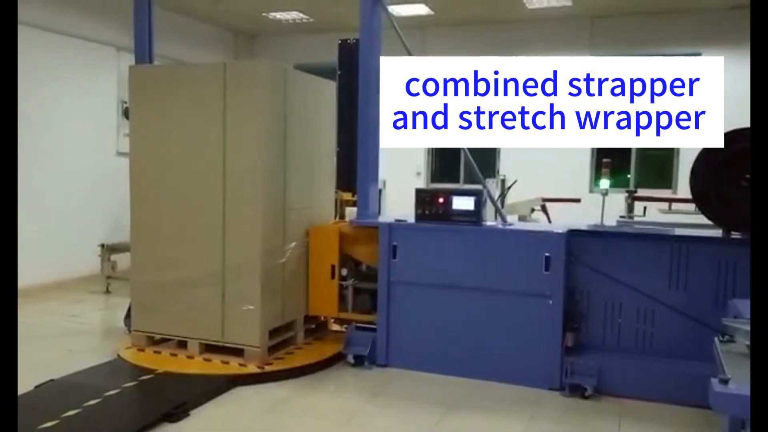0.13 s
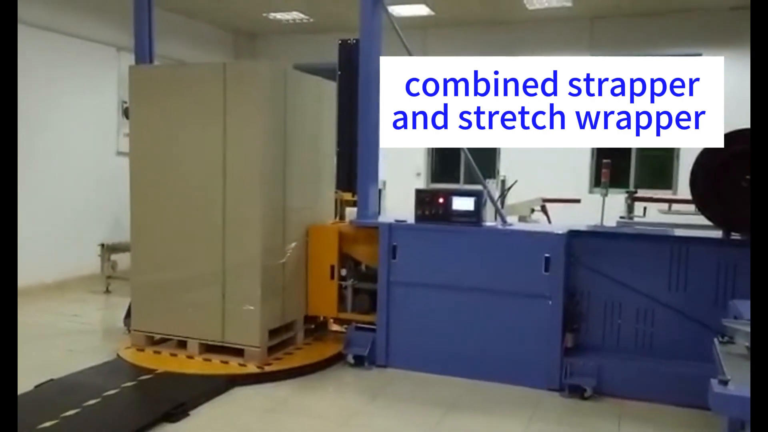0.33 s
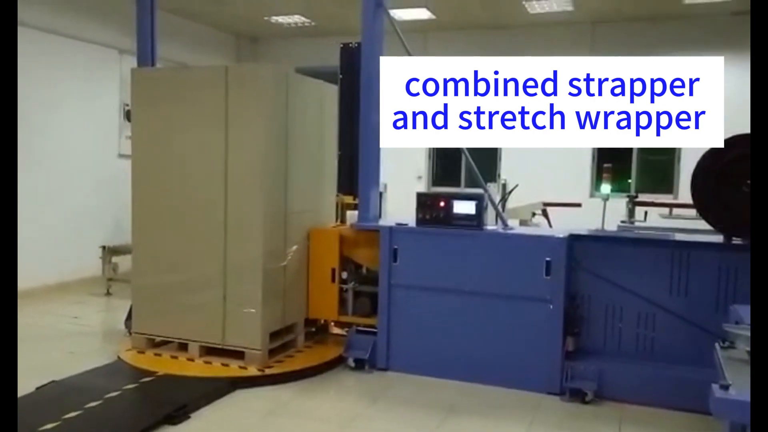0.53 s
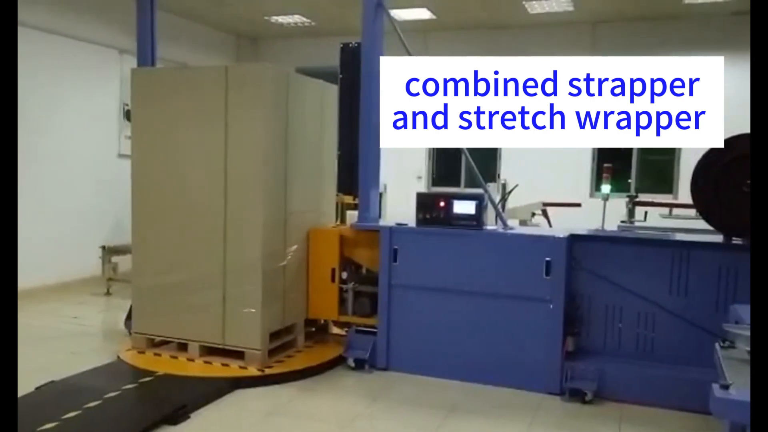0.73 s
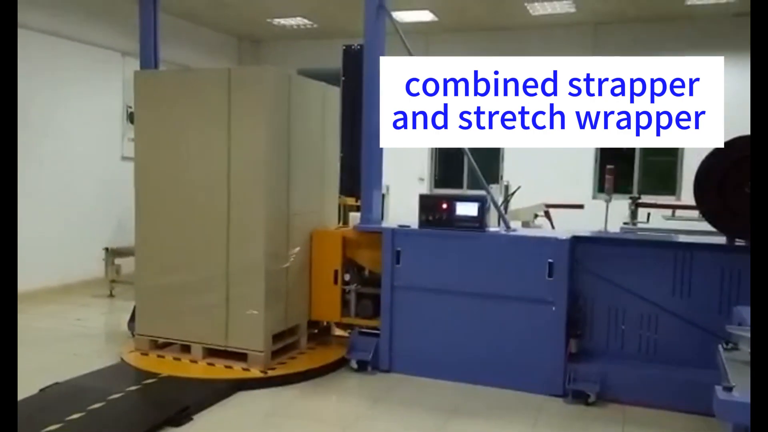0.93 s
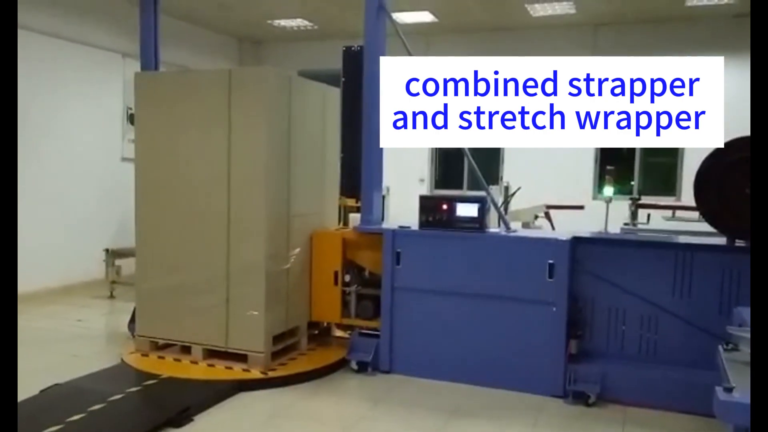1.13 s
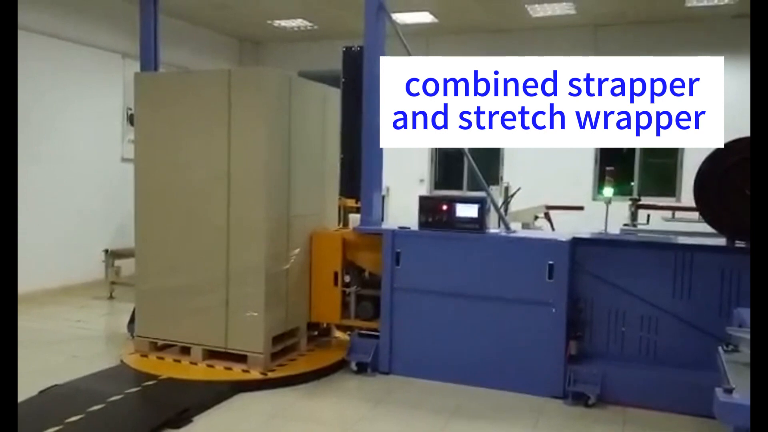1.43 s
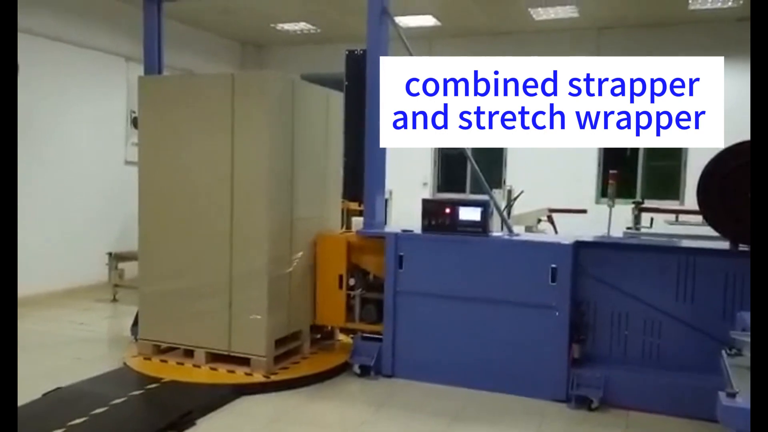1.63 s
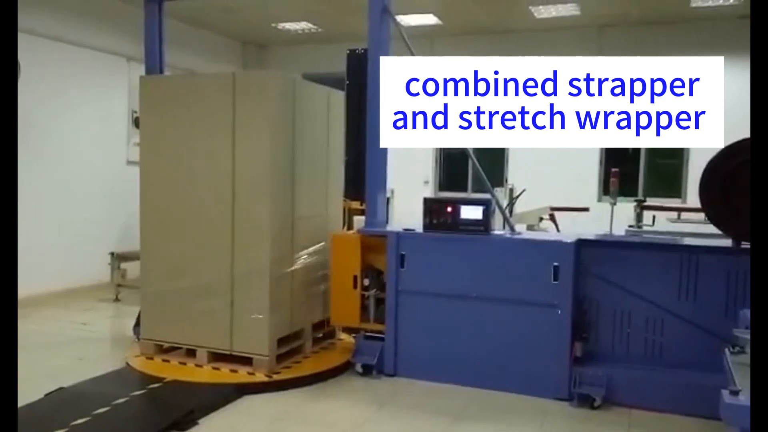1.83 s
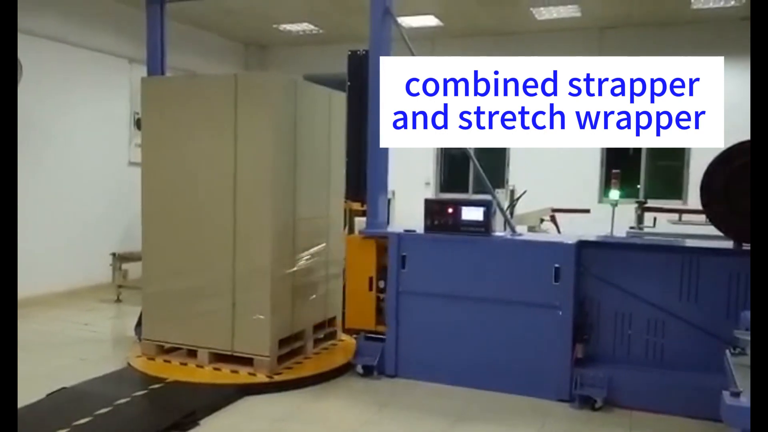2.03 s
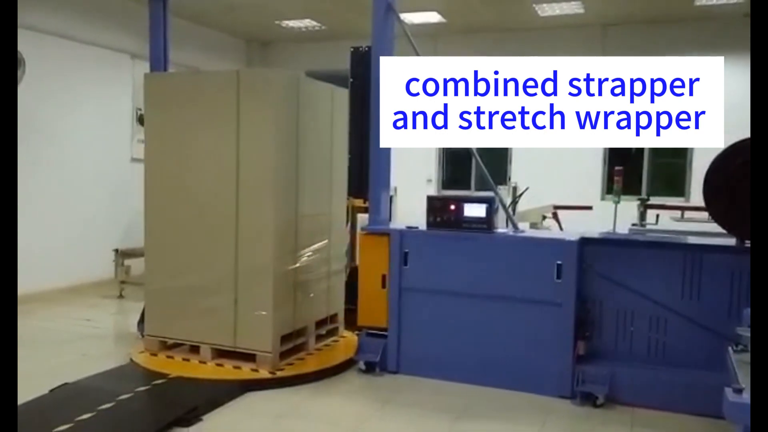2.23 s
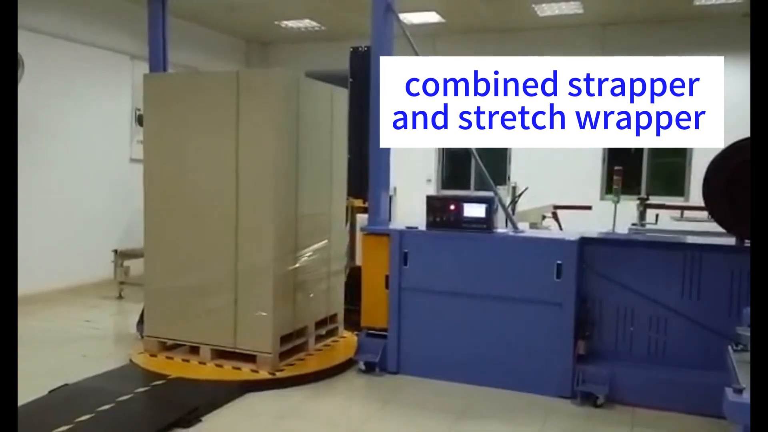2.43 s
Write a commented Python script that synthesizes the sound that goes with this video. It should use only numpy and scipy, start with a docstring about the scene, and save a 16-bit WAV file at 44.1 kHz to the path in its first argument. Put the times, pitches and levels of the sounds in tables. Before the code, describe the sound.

Uneven mechanical clacking from a turntable packaging machine, busiest in the first second, thinning out midway, with low drive rumble and faint hiss beneath, ending on a bright metallic crack; single-channel phone pickup, hard room echo.

```python
"""Pallet wrapping and strapping machine

The machine works in a hard-walled hall, heard from several metres by a phone. Latches and linkages clack
and snap: bursts of noise that die away in separate bands, each with a short hall tail. Chains and rollers
rattle as crowds of tiny noise ticks, and a strap guide squeals at the start as a tone blurred by noise.
Under it all, shaped noise makes the rumble of the drive and a steady hiss.
"""
import sys
import numpy as np
from scipy import signal
from scipy.fft import rfft, irfft
from scipy.io import wavfile
from scipy.ndimage import uniform_filter1d

SR = 44100
rng = np.random.default_rng(int(sys.argv[2]) if len(sys.argv) > 2 else 0)


def persist_wave(psi):
    """Save psi, clipped to +-1, as 16-bit WAV."""
    counts = np.round(np.clip(psi, -1, 1) * 32767).astype(np.int16)
    wavfile.write(sys.argv[1], SR, np.atleast_2d(counts).T)


N = 114219  # length [samples]

# In every table, t60 is the time a sound takes to fall by 60 dB.
# Levels of clacks and rattle are those before scene() mixes the layers.

# Tone colour of the steady hiss: (frequency [Hz], relative level per Hz [dB])
HISS_COLOUR = [(290, -60), (500, 7), (1000, -4), (1800, -6.5), (3600, -7), (5200, -9), (7500, -37.5),
               (9500, -26.5), (12000, -36)]
HISS_DB = -41

# Strength of the drive rumble: (time [s], rumble level [dB], deep bass level [dB])
DRIVE_LEVELS = [(0.0, -31.5, -68), (0.06, -35.5, -58), (0.1, -30, -54), (0.16, -44, -54),
                (0.22, -34.5, -69), (0.47, -28.5, -41), (0.5, -31, -51), (0.55, -29, -36),
                (0.66, -35.5, -49), (1.02, -31.5, -46), (1.14, -36.5, -54), (1.17, -35.5, -53),
                (1.28, -35, -51), (1.34, -34, -32), (1.38, -35, -50), (1.49, -38, -43),
                (1.57, -31.5, -52.5), (1.82, -38, -47), (1.85, -37.5, -46), (2.16, -33, -42.5),
                (2.31, -28.5, -39), (2.35, -33.5, -45), (2.47, -32.5, -36), (2.5, -33.5, -56),
                (2.57, -30, -43), (2.59, -31, -53)]
# Tone colour of the rumble: (frequency [Hz], relative level per Hz [dB])
RUMBLE_COLOUR = [(95, -41), (135, -1.5), (178, -2), (248, -1.5), (384, -6.5), (430, -6), (900, -23.5),
                 (1500, -23), (3300, -120)]
# Tone colour of the deep bass: (frequency [Hz], relative level per Hz [dB])
DEEP_BASS_COLOUR = [(13, -47), (22, -19), (43, -17), (120, -5), (160, -23), (260, -120)]

# Strength of the strap guide's squeal: (time [s], level [dB])
SQUEAL_LEVELS = [(0, -22), (.035, -34), (.055, -27), (.08, -30), (.11, -25), (.16, -31), (.205, -27.5),
                 (.25, -30), (.3, -43), (.4, -58)]
# Its gliding pitch: (time [s], frequency [Hz])
SQUEAL_GLIDE = [(0, 3000), (.04, 3060), (.17, 3060), (.22, 2970), (.27, 2900)]
SQUEAL_WIDTH_HZ, SQUEAL_TONE_DB = 230, -2  # width of the noise; tone against each of its two noise parts

# Strength of the chains and rollers: (time [s], main level [dB], low part level [dB], treble level [dB])
RATTLE_LEVELS = [(0.0, -20, -31.5, -41), (0.17, -26, -34, -44.5), (0.25, -20.5, -32, -41.5),
                 (0.4, -23.5, -28.5, -50.5), (0.54, -35, -41, -69), (0.55, -30, -32, -52),
                 (0.61, -29.5, -38, -55), (0.64, -31.5, -19, -57), (0.71, -27, -44, -59),
                 (0.72, -27.5, -33, -61), (0.89, -25.5, -25, -54), (1.04, -25.5, -28, -59),
                 (1.16, -36.5, -33, -59), (1.27, -37, -29, -59), (1.36, -28, -29.5, -57),
                 (1.52, -36.5, -30, -59), (1.57, -26.5, -28, -59), (1.7, -38, -35, -59),
                 (1.95, -39.5, -47, -59), (2.04, -39.5, -36, -61), (2.06, -36.5, -37, -52),
                 (2.14, -32, -43, -60), (2.15, -28, -33, -57), (2.2, -26.5, -30, -60),
                 (2.34, -33.5, -28.5, -53), (2.36, -30, -37, -48), (2.54, -23.5, -23.5, -50),
                 (2.55, -26.5, -29, -45)]
# Tone colour of the main rattle: (frequency [Hz], relative level per Hz [dB])
RATTLE_TONE = [(250, -72), (530, 0), (900, -12.5), (1560, -1), (2140, 0.5), (4430, 1.5), (6400, -15),
               (7950, -37), (12000, -69)]
RATTLE_PER_S, RATTLE_SCATTER_DB, RATTLE_T60_S = 700, 2, 0.066  # tick rate, unevenness, fading time

# Ringing parts of two sharp metallic snaps: (start [s], crack level [dB], centre [Hz], width [Hz],
# crack t60 [s], hall tail against the crack [dB])
SNAP_PARTS = [(2.055, -27, 4770, 1100, 0.057, -10), (2.055, -34.5, 5100, 201, 0.32, -9),
              (2.565, -15.5, 4060, 1500, 0.083, -7), (2.564, -15, 3240, 4820, 0.057, -10),
              (2.563, -23, 660, 1130, .03, -7), (2.566, -32, 9000, 4930, 0.038, -7)]
SNAP_TAIL_T60_S = 0.59

# Blows of latches and linkages: (start [s], first tick [dB], thud [dB], body [dB], knock [dB], clack [dB],
# ring [dB], sizzle [dB], rise time [s])
BLOWS = [(0.033, -7, -50, -27, -32, -24, -24, -52, 0.0029),
         (0.1274, -13, -40, -27, -28, -19, -15.5, -37, 0.0043),
         (0.202, -15, -24, -32, -31, -25, -16.5, -36, 0.0023),
         (0.2534, -13.5, -29, -25, -31.5, -30, -16, -30, 0.0026),
         (0.3474, -13.5, -19, -31, -29.5, -22, -24, -58, 0.0019),
         (0.4194, -21, -35, -46, -37, -30, -36, -69, 0.005),
         (0.4694, -31, -31, -47, -38, -24, -52, -77, 0.0058),
         (0.5444, -21, -27, -26, -26, -37, -15, -34, 0.0089),
         (0.6574, -11, -49, -18.5, -24, -33, -30, -65, 0.005),
         (0.6998, -6, -50, -21, -23, -30, -24, -67, 0.0021),
         (0.7474, -18, -33, -24, -32, -26, -33, -69, 0.0039),
         (0.8094, -11, -45, -38, -45, -20.5, -34, -60, 0.005),
         (0.8594, -16.5, -49, -24, -42, -21, -43, -56, 0.0038),
         (0.896, -21, -30, -34, -30, -32, -39, -49, 0.0031),
         (0.9306, -13.5, -49, -35, -28, -28, -21.5, -36.5, 0.004),
         (1.008, -14, -31, -26.5, -28, -25, -25.5, -43, 0.005),
         (1.0684, -34, -40, -26, -40, -45, -33, -60, 0.004),
         (1.293, -20, -27, -31.5, -29, -34, -20, -45, 0.0054),
         (1.3194, -21, -23.5, -36, -37, -36, -27, -46, 0.0042),
         (1.349, -12.5, -44, -24.5, -28, -27, -24.5, -45, 0.0062),
         (1.5446, -16, -26.5, -28, -34, -25, -21.5, -44.5, 0.0077),
         (1.6294, -48, -24, -40, -40, -40, -52, -60, 0.005),
         (2.058, -19, -32, -26, -33, -37, -23, -47, 0.0044),
         (2.0794, -14, -39, -27, -29, -37, -38, -58.5, 0.005),
         (2.1497, -10.5, -31, -23, -25, -20, -31, -45, 0.005),
         (2.1685, -10, -24.5, -33, -26, -19.5, -21, -37.5, 0.013),
         (2.349, -11, -51, -29, -25.5, -30, -29, -38, 0.012),
         (2.4775, -14, -39, -29, -33, -21.5, -34, -42, 0.0024)]
# Bands of a blow, from thud to sizzle: (low edge [Hz], high edge [Hz], crack t60 [s], hall tail t60 [s],
# hall tail against the crack [dB])
BLOW_BANDS = [(144, 428, 0.042, 0.77, -7.5), (328, 1276, 0.068, 0.89, -7), (1195, 2450, 0.049, 1, -5.5),
              (2193, 2760, 0.032, 0.63, -12), (3190, 5730, 0.014, 0.34, -9.5),
              (6500, 11650, 0.013, 0.31, -7.5)]
TICK_T60_S, TICK_SHARE_DB = 0.018, -16  # first contact of a blow; the share is added to its tick level
ATTACK_S = .0012  # usual rise time

TOP_HZ = 11900  # where the phone cuts the treble


def undb(db):
    """Turn decibels into a plain gain."""
    return 10 ** (np.asarray(db) / 20)


def unit(x):
    """Scale a sound to an average (RMS) strength of 1."""
    return x / np.sqrt(np.mean(x ** 2))


def over_time(table, col):
    """Join the points in one column of a table by straight lines over time."""
    rows = np.array(table)
    return np.interp(np.arange(N) / SR, rows[:, 0], rows[:, col])


def curve(table, col):
    """Turn one dB column of a table into a gain over time."""
    return undb(over_time(table, col))


def colour(x, table):
    """Weight the frequencies of a sound by a colour table, then set its strength to 1."""
    rows = np.array(table, float)
    hz = np.maximum(np.arange(len(x) // 2 + 1) * SR / len(x), 1)
    gain_db = np.interp(np.log(hz), np.log(rows[:, 0]), rows[:, 1])
    return unit(irfft(rfft(x) * undb(gain_db), len(x)))


def bandpass(x, lo_hz, hi_hz):
    """Keep mainly the frequencies between two edges."""
    sos = signal.butter(3, [lo_hz, hi_hz], "band", fs=SR, output="sos")
    return signal.sosfilt(sos, x)


def walk(rate):
    """Wander at random: values held for 1 / rate seconds, then smoothed; spread near 1."""
    hold = int(SR / rate)
    steps = np.repeat(rng.standard_normal(N // hold + 1), hold)
    smooth = uniform_filter1d(uniform_filter1d(steps, hold), hold)
    return unit(smooth[:N])


def decay(start_s, t60_s, attack_s=ATTACK_S):
    """Give the power of a blow: a quick rise times an exponential fall."""
    t = np.maximum(np.arange(N) / SR - start_s, 0)
    rise = 1 - np.exp(-t / max(attack_s, .0003))
    fall = np.exp(-2 * np.log(1000) * t / t60_s)
    return rise * fall


def burst(power, lo_hz, hi_hz):
    """Make noise follow a power curve, then confine it to a band."""
    noise = np.sqrt(power * SR / 2 / (hi_hz - lo_hz)) * rng.standard_normal(N)
    return bandpass(noise, lo_hz, hi_hz)


def hiss():
    """Steady hiss of the hall: random noise given a fixed tone colour."""
    return colour(rng.standard_normal(N), HISS_COLOUR) * undb(HISS_DB)


def drive():
    """Low rumble of motor and turntable: wavering noise, with deep bass under it."""
    rumble = colour(rng.standard_normal(N), RUMBLE_COLOUR)
    rumble = rumble * curve(DRIVE_LEVELS, 1) * undb(1.53 * walk(16))
    deep = colour(rng.standard_normal(N), DEEP_BASS_COLOUR)
    deep = deep * curve(DRIVE_LEVELS, 2) * undb(1.7 * walk(11))
    return rumble + deep


def squeal():
    """Rough whistle of friction: a tone inside a narrow band of noise that follows its pitch."""
    pitch_hz = over_time(SQUEAL_GLIDE, 1)
    spin = np.exp(2j * np.pi * np.cumsum(pitch_hz) / SR)
    sos = signal.butter(2, SQUEAL_WIDTH_HZ / 2, fs=SR, output="sos")
    slow = signal.sosfilt(sos, rng.standard_normal((2, N)))
    blur = unit(slow[0]) + 1j * unit(slow[1])
    # Spinning the slow noise lifts it up around the pitch.
    whistle = ((blur + undb(SQUEAL_TONE_DB)) * spin).real
    return unit(whistle) * curve(SQUEAL_LEVELS, 1)


def rattle():
    """Chains and rollers: dense uneven ticks, each a short dying burst of noise."""
    chance, size = rng.random((2, N))
    ticks = (chance < RATTLE_PER_S / SR) * undb(-2 * RATTLE_SCATTER_DB * np.log(size + .03))
    keep = np.exp(-2 * np.log(1000) / (RATTLE_T60_S * SR))  # power left after one sample
    power = signal.lfilter([1], [1, -keep], ticks) + 1e-9
    grains = unit(np.sqrt(power) * rng.standard_normal(N))
    main = colour(grains, RATTLE_TONE) * curve(RATTLE_LEVELS, 1) * undb(0.42 * walk(20))
    treble = unit(bandpass(grains, 4000, 10400)) * curve(RATTLE_LEVELS, 3)
    low = unit(bandpass(grains, 356, 1236)) * curve(RATTLE_LEVELS, 2)
    return main + treble + low * undb(-4 + 0.6 * walk(21.6))


def latch():
    """Metallic snaps: in each band a hard crack of noise, then a tail in the hall."""
    out = 0
    for start, db, centre, width, crack_t60, tail_db in SNAP_PARTS:
        power = decay(start, crack_t60) + undb(2 * tail_db) * decay(start, SNAP_TAIL_T60_S)
        out = out + undb(db) * burst(power, centre - width / 2, centre + width / 2)
    return out


def clacks():
    """Blows of metal parts: a tick of first contact, then a crack and a hall tail in every band."""
    # Doubling the decibels turns a sound level into power.
    tick_power = sum(undb(2 * blow[1]) * decay(blow[0], TICK_T60_S) for blow in BLOWS)
    out = undb(TICK_SHARE_DB) * burst(tick_power, 1540, 5400)
    for b, (lo_hz, hi_hz, crack_t60, tail_t60, tail_db) in enumerate(BLOW_BANDS):
        power = 0
        for start, _, *band_db, rise in BLOWS:
            crack = decay(start, crack_t60, rise)
            tail = undb(2 * tail_db) * decay(start, tail_t60, rise)
            power = power + undb(2 * band_db[b]) * (crack + tail)
        out = out + burst(power, lo_hz, hi_hz)
    return out


def scene():
    """Mix all the layers into one channel."""
    background = hiss() + drive()
    machine = squeal() + undb(-4) * rattle() + latch() + undb(-3.5) * clacks()
    return (background + machine)[None]


def record(dry):
    """The phone cuts the top: a steep filter removes the highest treble."""
    return signal.sosfilt(signal.ellip(10, .2, 80, TOP_HZ, fs=SR, output="sos"), dry)


dry = scene()
out = record(dry)
persist_wave(out)
```